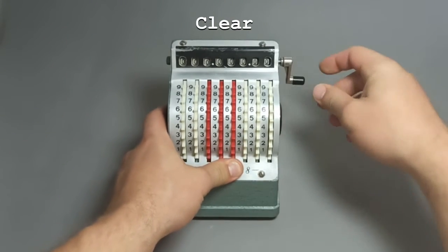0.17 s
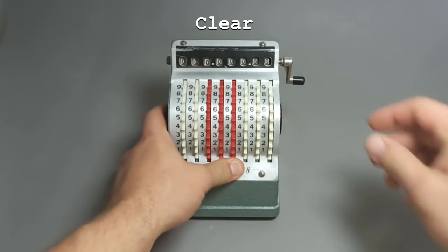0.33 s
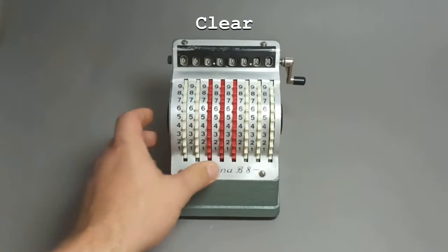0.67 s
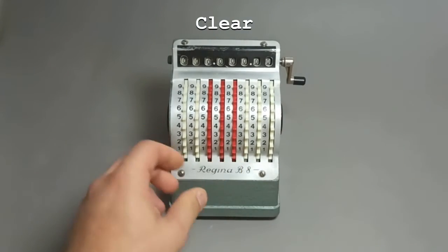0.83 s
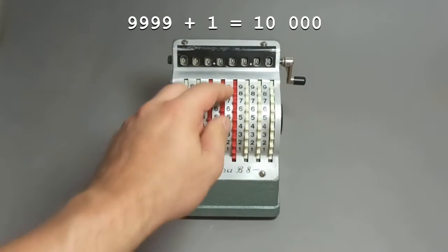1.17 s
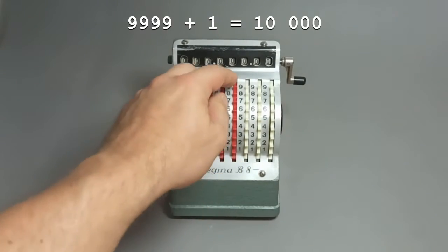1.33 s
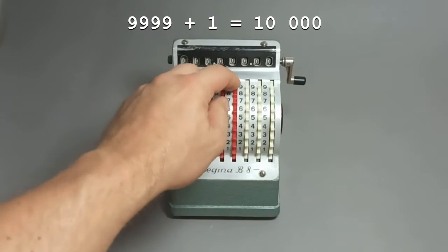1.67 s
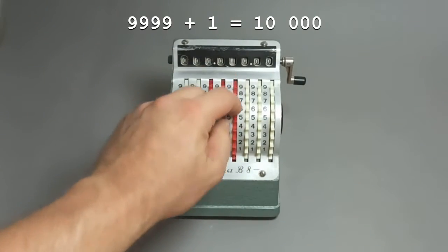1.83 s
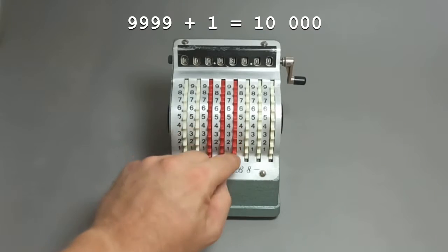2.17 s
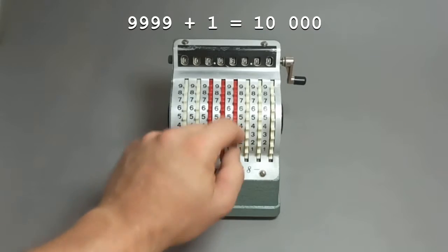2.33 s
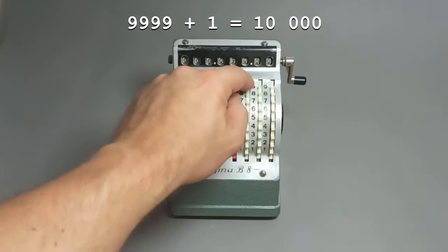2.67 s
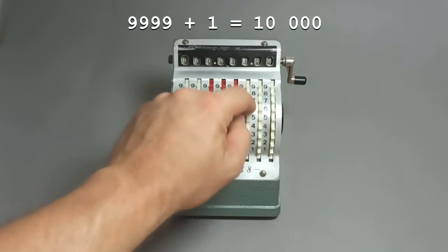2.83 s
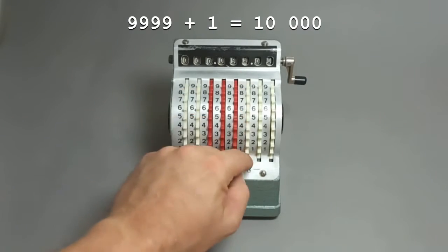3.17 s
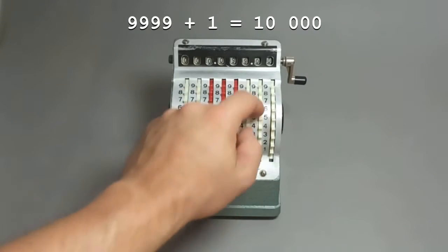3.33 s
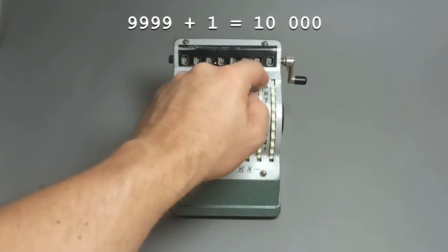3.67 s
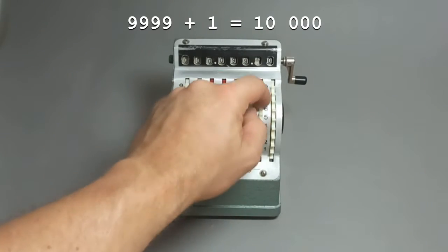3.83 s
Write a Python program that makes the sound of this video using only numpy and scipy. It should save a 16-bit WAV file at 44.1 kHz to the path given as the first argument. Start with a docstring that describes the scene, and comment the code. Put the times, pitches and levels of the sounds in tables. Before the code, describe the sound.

Metallic lever clicks run in quick uneven strokes with table thumps and short room reverb, after a dying clack, a small knock and near silence with low hum; close stereo microphone, hard-walled room.

```python
"""Small steel calculator on a table top, close stereo microphone, quiet hard-walled room; tone and hum throughout.
Start: the clearing crank's clack dies away as a modal table boom and noise-tail reverb; a thin hiss (band noise)
sets in and dips. At 0.49 s the thumb lets go of the clearing key (damped sines); fingers touch the case now and then
(soft noise bursts), the hiss swells near 1.05 s and fades, the hand rustles on the table (band noise). From 1.8 s a
finger drags three levers: each stroke opens with a scrape, each tooth rattles, rings the case and thumps the table."""
import sys
import numpy as np
from scipy import signal
from scipy.fft import rfft, irfft, next_fast_len
from scipy.io import wavfile
from scipy.ndimage import uniform_filter1d

SR = 44100
rng = np.random.default_rng(int(sys.argv[2]) if len(sys.argv) > 2 else 0)


def magnitude_from_level(level_db):
    """Linear magnitude for a level in decibels (20 dB per decade)."""
    exponent = np.asarray(level_db, float) / 20
    return 10 ** exponent


def waveform_to_disk(signal):
    """Save audio, clipped to [-1, 1], as 16-bit WAV at the path in sys.argv[1]."""
    frames = np.transpose(np.atleast_2d(signal))
    scaled = np.clip(frames, -1, 1) * 32767
    samples = np.round(scaled).astype(np.int16)
    wavfile.write(sys.argv[1], SR, samples)


N = 176400
LEAD_SAMPLES = 4410  # run-in before t = 0, trimmed in scene()
HALF_CLICK_SAMPLES = 1536
UNLIKE = 0.6  # left/right difference of the contact noises: 0 same, 1 independent


def shape(x, points):
    """Zero-phase filter through (f/Hz, gain/dB) points, joined on a log-frequency axis."""
    n = next_fast_len(x.shape[-1] + 512)
    hz, db = np.array(points, float).T[:2]
    f = np.arange(n // 2 + 1) * SR / n + 1
    gain = magnitude_from_level(np.interp(np.log(f), np.log(hz), db))
    return irfft(rfft(x, n) * gain, n)[..., :x.shape[-1]]


def level(x, db):
    """Scale to an rms level in dB."""
    return x * magnitude_from_level(db) / np.sqrt(np.mean(x ** 2))


def band(x, hz, width_hz):
    """Two-pole resonant band-pass."""
    return signal.lfilter(*signal.iirpeak(hz, hz / width_hz, SR), x)


def ring(hz, t60_s, gain, size):
    """Sum of exponentially decaying sines, one per mode."""
    t = np.arange(size) / SR
    decay = np.exp(-np.log(1000) * np.outer(1 / t60_s, t))
    return gain @ (np.sin(2 * np.pi * np.outer(hz, t)) * decay)


def add(out, x, start_s):
    """Mix a sound in at a time."""
    i = int(start_s * SR) + LEAD_SAMPLES
    out[..., i:i + x.shape[-1]] += x[..., :out.shape[-1] - i]


def pair(size, unlike):
    """Two noise channels: common part plus an opposed part."""
    common, opposed = rng.standard_normal((2, size))
    unlike = np.clip(unlike, 0, 1)
    return np.array([common + unlike * opposed, common - unlike * opposed])


def curve(rows):
    """Gain over time from (t/s, level/dB) rows; -95 dB outside them."""
    return magnitude_from_level(np.interp(np.arange(N) / SR, *np.array(rows).T, left=-95, right=-95))


def click(colour, db):
    """Single sharp blow: a coloured impulse centred in a short buffer."""
    blow = np.zeros((2, 2 * HALF_CLICK_SAMPLES))
    blow[:, HALF_CLICK_SAMPLES] = 1
    return level(shape(blow, colour), db)


def burst(length_s, release_s):
    """Dense tiny impacts: quick rise, slow sag, quick fall, uneven bounces; also returns the envelope."""
    size, attack_s, sag_s = 3072, 0.0025, 0.029
    ticks_per_s, tick_spread_db = 16000, 1.3
    bounce_s, bounce_db = 0.003, 2.2
    t = np.arange(size) / SR
    fall = np.exp(-t / sag_s - np.maximum(t - length_s, 0) / release_s)
    env = np.clip(t / attack_s, 0, 1) * fall
    u, e = rng.random((2, size))
    ticks = (u < ticks_per_s / SR) * magnitude_from_level(-tick_spread_db * np.log(e + 1e-9)) + 0.17  # 0.17: steady floor
    k = int(bounce_s * SR)
    wander = np.sqrt(k) * uniform_filter1d(rng.standard_normal(size), k)
    return env * ticks * magnitude_from_level(bounce_db * wander) * pair(size, UNLIKE), env


# room tone colour: f/Hz, relative density/dB
TONE_COLOUR = [(30, -33.5), (50, -29), (68, -12.5), (250, -13), (500, -19), (950, -24.5), (1300, -31),
               (4500, -35.5), (5600, -43), (6300, -34.5), (8300, -37.5), (8800, -46), (11400, -49.5),
               (11700, -41.5), (15700, -38)]


def room_tone():
    """Steady coloured noise, only faintly alike in the two channels."""
    return level(shape(pair(N, 0.89), TONE_COLOUR), -58)


def hum():
    """Wavering hum: noise through two narrow resonances, same in both channels."""
    hz = 116.7
    narrow = band(rng.standard_normal(N), hz, width_hz=5.2)
    return level(band(narrow, hz, width_hz=53), -57)


# crank clack colour: f/Hz, relative level/dB
CLACK_COLOUR = [(115, 5), (200, -16), (310, -5), (430, 0.5), (600, -10.5), (1000, -14.5), (2100, -3.5),
                (3000, -11), (4600, -6), (4950, -25.5), (6400, -12), (8200, -17), (15500, -37.5)]
CLACK_S, CLACK_DB, CLACK_THUMP_DB = -0.004, -29.5, -35


def crank():
    """One hard coloured click centred just before t = 0; its end is heard."""
    out = np.zeros((2, N + LEAD_SAMPLES))
    add(out, click(CLACK_COLOUR, CLACK_DB), CLACK_S - HALF_CLICK_SAMPLES / SR)
    return out


# table-top modes: f/Hz, t60/s, relative level/dB
TABLE_MODES = [(115.3, 0.77, -2.5), (109.1, 0.44, -4), (212.3, 0.18, -9), (254.2, 0.22, -6),
               (298, 0.28, -7), (447, 0.26, -6.5), (508, 0.33, -10.5), (652.3, 0.135, -10)]


def table_top():
    """Every jolt pushes the top softly and sets its modes booming, with scattered gains."""
    size, push_s, scatter_db = 30000, 0.018, 2.9
    out = np.zeros(N + LEAD_SAMPLES)
    hz, t60_s, mode_db = np.array(TABLE_MODES, float).T
    jolts = [(row[0], row[2]) for row in list(TEETH) + list(TOUCHES)]
    jolts += [(CLACK_S, CLACK_THUMP_DB), (KEY_S, KEY_THUMP_DB)]
    rise = 1 - np.exp(-np.arange(size) / SR / push_s)
    for start_s, thump_db in jolts:
        gain = magnitude_from_level(mode_db + scatter_db * rng.standard_normal(len(hz)))
        add(out, ring(hz, t60_s, gain * magnitude_from_level(thump_db), size) * rise, start_s)
    return out


# room decay bands: f/Hz, t60/s, relative level/dB
ROOM_DECAY = [(238.7, 1, 8), (509, 0.8, 4.5), (986, 0.7, 3), (2040, 0.65, -2.5), (3820, 0.64, -2),
              (7440, 0.55, -4), (12200, 0.37, -2.5)]


def room(x):
    """Early reflections off the table plus a diffuse tail that fades band by band, as noise responses."""
    early_t60_s, early_db, build_up_s = 0.014, 0.5, 0.0077
    t = np.arange(40000) / SR

    def fade(t60_s):
        return np.exp(-np.log(1000) * t / t60_s) / np.sqrt(t60_s * SR / 14)

    response = magnitude_from_level(early_db) * fade(early_t60_s) * rng.standard_normal((2, len(t)))
    build_up = np.clip(t / build_up_s, 0, 1)
    for hz, t60_s, db in ROOM_DECAY:
        octave = [(hz / 2, -40), (hz / 1.62, -3), (hz, 0), (hz * 1.22, -3), (hz * 2, -40)]
        diffuse = shape(pair(len(t), 0.8), octave)
        response = response + magnitude_from_level(db) * fade(t60_s) * build_up * diffuse
    return signal.fftconvolve(x.mean(0)[None], response)[:, :N + LEAD_SAMPLES]


# hiss: t/s, level/dB
HISS_LEVEL = [(.2, -66), (.75, -74.5), (1.05, -65), (1.25, -73.5), (1.7, -97)]


def hiss():
    """Thin high hiss that sets in, dips, swells again and fades: noise through two resonances."""
    hz = 6350
    narrow = band(pair(N, 0.26), hz, width_hz=350)
    return level(band(narrow, hz, width_hz=480), 0) * curve(HISS_LEVEL)


# clearing key modes: f/Hz, t60/s, relative level/dB
KEY_MODES = [(377, 0.053, 5.5), (543, 0.021, 9.5), (1270, 0.02, 2)]
# soft contact colour: f/Hz, relative level/dB
SOFT_COLOUR = [(150, 4), (400, 2), (900, -8.5), (2000, -4.5), (4500, -13), (5300, -22), (6500, -7.5),
               (8300, -20), (12000, -23.5)]
KEY_S, KEY_THUMP_DB = 0.49, -41


def key():
    """Thumb lets go of the clearing key: short hollow modal knock with a faint tick."""
    size, rise_s, knock_db, tick_db = 4096, 0.0012, -39, -65
    out = np.zeros((2, N + LEAD_SAMPLES))
    hz, t60_s, mode_db = np.array(KEY_MODES, float).T
    rise = np.clip(np.arange(size) / SR / rise_s, 0, 1)
    add(out, ring(hz, t60_s, magnitude_from_level(mode_db + knock_db), size) * rise, KEY_S)
    add(out, click(SOFT_COLOUR, tick_db), KEY_S - HALF_CLICK_SAMPLES / SR)
    return out


# finger touches: t/s, level/dB (scaled by envelope rms), thump/dB
TOUCHES = [(0.853, -68, -52.5), (2.717, -48, -59), (3.26, -41.5, -44), (3.408, -44, -47),
           (3.494, -42.5, -43), (3.525, -59.5, -42), (3.785, -51, -46)]


def touches():
    """Soft broad finger contacts on the case: softly coloured impact bursts."""
    out = np.zeros((2, N + LEAD_SAMPLES))
    for start_s, db, _ in TOUCHES:
        ticks, env = burst(length_s=0.01, release_s=0.011)
        add(out, level(shape(ticks, SOFT_COLOUR), db) * np.sqrt(np.mean(env ** 2)), start_s)
    return out


# rustle: t/s, level/dB
RUSTLE_LEVEL = [(1.15, -70), (1.35, -53.5), (1.6, -55), (1.78, -57)]


def rustle():
    """Low rustle as the hand moves on the table: noise through two low resonances."""
    low = band(band(pair(N, 0.66), 312, width_hz=48), 160, width_hz=95)
    return level(low, 0) * curve(RUSTLE_LEVEL)


# first tooth of each stroke: t/s, scrape level before the swell/dB
SLACK = [(1.806, -37), (2.805, -49), (3.863, -39)]
# broad tooth colour: f/Hz, relative level/dB
RATTLE_COLOUR = [(300, -14.5), (750, -27.5), (1150, -27), (1600, -7.5), (2700, -6.5), (4600, -3.5),
                 (5600, -17.5), (6300, -24), (8000, 3)]


def slack():
    """Lever scrapes through its slack: faint noise growing exponentially up to the first tooth."""
    size, growth_s = 2048, 0.013
    out = np.zeros((2, N + LEAD_SAMPLES))
    t = np.arange(-size, 0) / SR
    for tooth_s, db in SLACK:
        scrape = level(shape(pair(size, UNLIKE), RATTLE_COLOUR), db)
        add(out, scrape * np.exp(t / growth_s), tooth_s + t[0])
    return out


# ratchet teeth: t/s, level/dB (scaled by envelope rms), thump/dB, lower ring/dB, treble/dB, rattle/s
TEETH = [(1.801, -17, -32, -20, 3, 0.013), (1.8526, -20.5, -30, -8, -0.5, 0.011),
         (1.91, -16, -32.5, -10, 1.5, 0.0082), (1.949, -16, -34, -18.5, 4, 0.0091),
         (1.982, -19, -35.5, -3, -2, 0.012), (2.023, -18.5, -33, -30, 1.5, 0.0088),
         (2.079, -19, -34, -11, 3.5, 0.0069), (2.130, -19, -43.5, -0.5, 2, 0.011),
         (2.179, -22, -33, -4.5, 3.5, 0.014), (2.804, -21, -36, -3, 0.5, 0.014),
         (2.858, -20.5, -30.5, 3, -1.5, 0.0082), (2.91, -20.5, -27.5, -2, 0, 0.0077),
         (2.9493, -18.5, -28, 5, -0.5, 0.010), (2.98, -18, -46, -16, 2.5, 0.015),
         (3.006, -16, -25.5, -9, 4, 0.0091), (3.035, -18, -28, -17, 2.5, 0.011),
         (3.063, -23.5, -33.5, -12, 1, 0.044), (3.094, -18, -45, -13, 1.5, 0.012),
         (3.863, -17, -30, -0.5, 1.5, 0.01), (3.897, -17.5, -31, -33, 5, 0.015),
         (3.934, -21, -36, -13, -3, 0.0091), (3.978, -16.5, -30, 3, 4.5, 0.01)]
# case modes: f/Hz, width/Hz, relative level/dB
CASE_MODES = [(1784, 37, -34.5), (1968, 350, -3.5), (3371, 157, -6.5), (4600, 150, 1.5), (6300, 73, -5),
              (6677, 410, 7.6), (7160, 130, -4.5), (7390, 67, -1), (7610, 67, -8.5)]
# top octave of a tooth: f/Hz, relative level/dB
AIR_COLOUR = [(11600, -2.5), (15800, -2.35)]


def lever():
    """Each tooth's rattle excites the case modes, whose gains and tuning differ every time."""
    modes_db, scatter_db, detune = -0.5, 3.2, 0.014  # detune: relative frequency spread
    low_ring_hz, treble_from_hz = 2400, 5500
    out = np.zeros((2, N + LEAD_SAMPLES))
    hz, width_hz, mode_db = np.array(CASE_MODES, float).T
    t60_s = np.log(1000) / (np.pi * width_hz)
    for start_s, db, _, low_db, treble_db, length_s in TEETH:
        ticks, env = burst(length_s, release_s=0.0062)
        gain_db = mode_db + scatter_db * rng.standard_normal(len(hz)) + (hz < low_ring_hz) * low_db
        gain = magnitude_from_level(gain_db) * np.sqrt(width_hz)
        tuned_hz = hz * (1 + detune * rng.standard_normal(len(hz)))
        modes = ring(tuned_hz, t60_s, gain, size=3072)
        case = signal.fftconvolve(ticks, modes[None])[:, :3072]
        x = level(shape(ticks, RATTLE_COLOUR + AIR_COLOUR), 0) + level(case, modes_db)
        x = shape(x, [(treble_from_hz - 400, 0), (treble_from_hz + 400, treble_db)])
        add(out, level(x, db) * np.sqrt(np.mean(env ** 2)), start_s)
    return out


# edges of an empty gap in the treble: lower f/Hz, upper f/Hz
GAP_HZ = (8900, 11480)


def scene():
    """Machine, table and room, with a treble gap and low cut, over the background."""
    gap_db, low_cut_hz, boom_to_room, key_to_room_db = -46, 66, 0.084, -15
    near = lever() + slack() + touches() + crank()
    boom, knock = table_top(), key()
    reverb = room(near + boom_to_room * boom + magnitude_from_level(key_to_room_db) * knock)
    heard = (near + knock + boom + reverb)[:, LEAD_SAMPLES:]
    low, high = GAP_HZ
    gap = [(low - 450, 0), (low + 300, gap_db), (high - 80, gap_db), (high + 80, 0)]
    low_cut = signal.butter(3, low_cut_hz, "high", fs=SR, output="sos")
    heard = signal.sosfilt(low_cut, shape(heard, gap))
    return heard + room_tone() + hum() + hiss() + rustle()


def low_pass(x):
    """Removes everything above the highest recorded frequency."""
    return signal.sosfilt(signal.butter(12, 17020, fs=SR, output="sos"), x)


# channel balance: f/Hz, left minus right/dB
LEAN = [(200, 0.9), (2000, -0.25), (6000, 2.5), (8500, -1)]


def record(dry):
    """Close capsules: bass nearly alike in both, balance leans with frequency, top cut."""
    mono_below_hz, top_hz = 690, 15880
    mid = (dry[0] + dry[1]) / 2
    side = shape((dry[0] - dry[1]) / 2, [(130, -18), (mono_below_hz, 0)])
    left = shape(mid + side, [(f, db / 2) for f, db in LEAN])
    right = shape(mid - side, [(f, -db / 2) for f, db in LEAN])
    top_cut = [(top_hz, 0), (top_hz + 200, -32), (17000, -40), (17300, -80)]
    return low_pass(shape(np.array([left, right]), top_cut))


dry = scene()
out = record(dry)
waveform_to_disk(out)
```